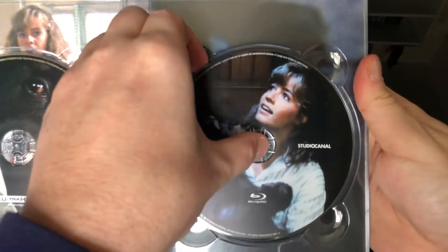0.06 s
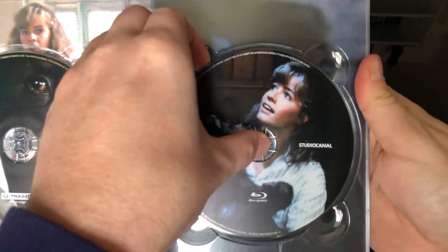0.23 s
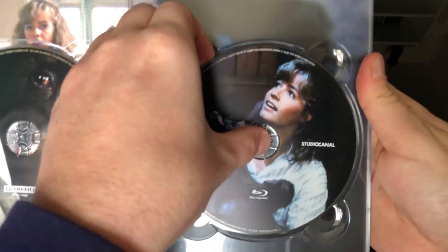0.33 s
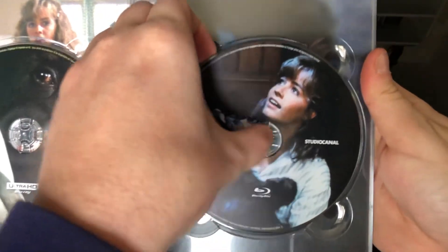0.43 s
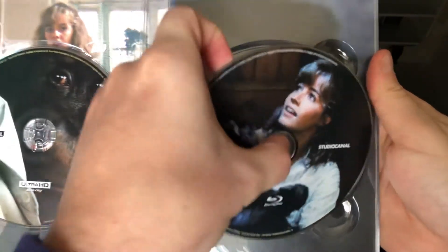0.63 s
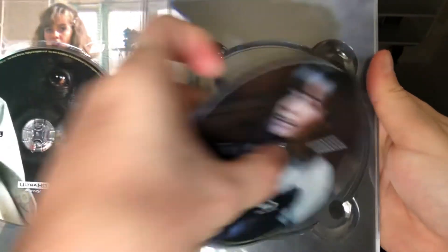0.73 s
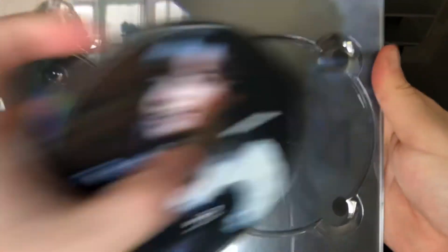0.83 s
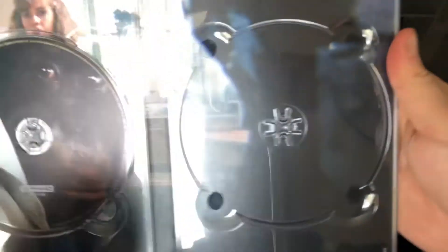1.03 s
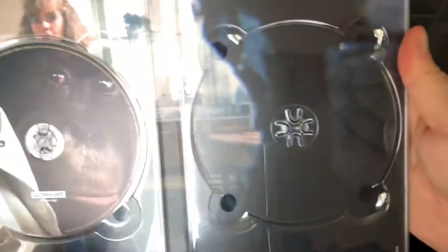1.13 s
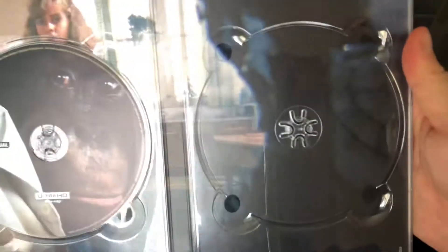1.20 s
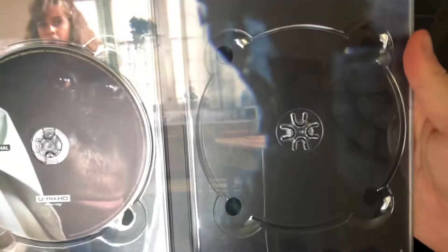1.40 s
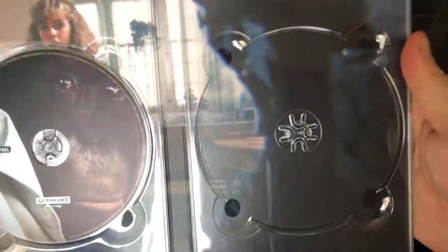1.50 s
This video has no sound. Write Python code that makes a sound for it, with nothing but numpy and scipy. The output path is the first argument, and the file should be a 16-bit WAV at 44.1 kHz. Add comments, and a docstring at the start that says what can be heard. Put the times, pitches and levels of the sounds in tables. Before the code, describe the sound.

A disc pops off a clear plastic tray hub, close up in a small room. Barely audible ticks come first, then one loud, bright snap at about 0.23 seconds with a low thump and decaying room tail. Lighter clicks and knocks follow from 0.4 to 0.65, a faint plastic rub with a ringing tone near 1.14, and soft dull knocks around 1.34 and 1.53, over faint rumble and hiss.

```python
"""A disc is prised off the hub of a clear plastic tray in a small room, close to the microphone.
The hub lets go with one sharp snap, a cluster of short slips; lighter contacts tick and knock around it.
Every contact rings the same plastic modes, its lows arriving last, and the room answers with a decaying tail.
Grains of noise swell as rubs of plastic on plastic, one with a ringing tone, over a faint rumble and hiss."""
import sys
import numpy as np
from scipy import signal
from scipy.fft import rfft, irfft, next_fast_len
from scipy.io import wavfile

SR = 44100
rng = np.random.default_rng(int(sys.argv[2]) if len(sys.argv) > 2 else 0)


def dump(signal):
    """Clip the signal to [-1, 1] and save it as 16-bit WAV at the path in sys.argv[1]."""
    limited = np.clip(np.atleast_2d(signal).T, -1, 1)
    pcm = np.round(limited * 32767).astype(np.int16)
    wavfile.write(sys.argv[1], SR, pcm)


N = 68355   # length in samples
PADDED = next_fast_len(N + SR // 2)   # room for echoes to run past the end without wrapping round
HZ = np.maximum(np.fft.rfftfreq(PADDED, 1 / SR), 1)
T = np.arange(N) / SR   # seconds


def from_db(db):
    """Decibels to gain."""
    return 10 ** (np.asarray(db) / 20)


def rms_one(x):
    """Scale to unit rms."""
    return x / np.sqrt(np.mean(x ** 2) + 1e-20)


def at_hz(points, hz):
    """Read a table of (Hz, value) along log frequency."""
    f, value = np.transpose(points)
    return np.interp(np.log(hz), np.log(f), value)


def filtered(x, response):
    """Pass a signal through a frequency response."""
    return irfft(rfft(x, PADDED) * response, PADDED)[:N]


def resonance(hz, width_hz):
    """Response of one mode, gain 1 on top."""
    return 1 / (1 + 1j * (HZ ** 2 - hz ** 2) / (HZ * width_hz))


def contacts(rows):
    """Force of short contacts: impulses, each with its own colour, the lows trailing the highs."""
    # Centres of the bands in which each contact's force is given, [Hz].
    bands_hz = [150, 400, 850, 1700, 4000, 11000]
    lag_cycles, lag_knee_hz = 1.6, 71.6   # delay in seconds = lag_cycles / (frequency + knee)
    low_cut_hz = 62   # the small plates radiate little deep bass
    force = 0
    for start_s, *band_dbs in rows:
        colour = from_db(at_hz(list(zip(bands_hz, band_dbs)), HZ))
        force = force + colour * np.exp(-2j * np.pi * HZ * start_s)
    lag = np.exp(-2j * np.pi * lag_cycles * np.log(1 + HZ / lag_knee_hz))
    low_cut = HZ ** 2 / (HZ ** 2 + low_cut_hz ** 2)
    return irfft(force * lag * low_cut, PADDED)[:N]


def tray(force):
    """The short ring of disc and tray, heard directly: strong modes and a dense shimmer of weak ones."""
    # Modes of disc and tray ringing together.
    # Each row: frequency in Hz, width in Hz, gain at its peak in dB.
    mode_rows = [(146, 32, -7), (265, 110, -15.5), (394, 110, -22), (575, 94, -10), (813, 80, -12.5),
                 (1072, 120, -11), (1235, 80, -7.5), (1710, 220, -11.5), (2323, 150, -1), (2445, 43, -4.5),
                 (2796, 240, 1.5), (3400, 310, -2), (3980, 170, -3.5), (4550, 180, -10), (4998, 250, -9),
                 (5650, 410, -15.5), (6430, 260, -6), (7420, 520, -12.5), (8480, 300, -15.5),
                 (10400, 550, -12.5), (11200, 180, -16.5), (12800, 400, -24), (15530, 800, -12)]
    shimmer_db, shimmer_t60_s = -16.5, 0.027
    shimmer_hz, shimmer_width_hz = 3660, 2700
    modes = sum(from_db(db) * resonance(hz, width_hz) for hz, width_hz, db in mode_rows)
    dying_noise = rng.standard_normal(N) * from_db(-60 * T / shimmer_t60_s)
    weak_modes = rms_one(dying_noise) / np.sqrt(N)   # unit energy
    shimmer = rfft(weak_modes, PADDED) * resonance(shimmer_hz, shimmer_width_hz)
    return filtered(force, modes + from_db(shimmer_db) * shimmer)


def room(force):
    """After a short gap, dense early reflections and a tail that dies band by band, plus one low mode."""
    # The room's colour in answer to a unit contact. Each row: frequency in Hz, level in dB.
    colour = [(80, -27.5), (160, -21), (350, -22.5), (550, -17.5), (750, -21), (1100, -12.5), (1700, -18),
              (2300, -12.5), (3400, -16.5), (5000, -10.5), (6500, -19), (9000, -22.5), (15500, -28.5)]
    # Late decay. Each row: frequency in Hz, time to fall 60 dB in s.
    late_t60 = [(150, 0.42), (1000, .48), (2700, .42), (5500, .44), (9000, .35), (15000, .29)]
    gap_s, rise_s = 0.01, 0.003
    early_t60_s, early_db = 0.094, 5.5   # early level is relative to the start of the late tail
    hum_hz, hum_width_hz, hum_db = 165.5, 3, -4.5   # narrow, so this low hum hangs on
    age = np.maximum(T - gap_s, 0)
    rise = np.minimum(age / rise_s, 1)
    early = from_db(early_db - 60 * age / early_t60_s)
    white = rfft(rng.standard_normal(N), PADDED)
    tail = 0
    edges = np.geomspace(50, 18000, 22)   # band edges in Hz
    for low, high in zip(edges, edges[1:]):
        band = irfft(white * ((HZ >= low) & (HZ < high)), PADDED)[:N]
        late = from_db(-60 * age / at_hz(late_t60, np.sqrt(low * high)))
        flat_gain = np.sqrt(2 * (high - low) / SR / N)   # equal energy per Hz before the colour
        tail = tail + rms_one(band * (late + early) * rise) * flat_gain
    hum = from_db(hum_db) * resonance(hum_hz, hum_width_hz)
    return filtered(force, rfft(tail, PADDED) * from_db(at_hz(colour, HZ)) + hum)


def treble_shelf(db):
    """Lift or lower the top, half of the change in dB at the corner."""
    corner_hz = 4940
    return from_db(db * HZ ** 4 / (HZ ** 4 + corner_hz ** 4))


def swell(peak_s, attack_s, release_s):
    """Exponential rise to a peak, then exponential fall."""
    return np.exp(-np.maximum((peak_s - T) / attack_s, (T - peak_s) / release_s))


def rubbing():
    """Plastic sliding on plastic: each stroke is a swell of dense, tiny, uneven slips."""
    # Each row: peak in s, attack in s, release in s, level at the peak in dB, treble shelf in dB.
    strokes = [(0.56, .03, 0.042, -71, 4), (0.667, .03, 0.0089, -61.5, 1), (0.961, .16, .07, -71, 5.5),
               (1.085, 0.028, 0.022, -68, 8), (1.130, 0.025, 0.02, -58.5, -1.5),
               (1.143, 0.016, .036, -59.5, -8.5)]
    # Colour of the friction ahead of each stroke's treble shelf. Each row: frequency in Hz, level in dB.
    colour = [(100, -12.5), (330, -2), (550, -2.5), (850, -1.5), (1100, -6), (1650, -1.5), (2400, -6),
              (2900, -9.5), (5000, -12.5), (7000, -15.5), (10000, -20.5), (15500, -17.5)]
    grains_per_s, grain_db = 9000, 1.5   # mean density; mean random boost before its cap
    out = 0
    for peak_s, attack_s, release_s, db, treble_db in strokes:
        slips = rng.random(N) < grains_per_s / SR
        boost = from_db(grain_db * np.minimum(rng.exponential(1, N), 4))
        grains = slips * rng.standard_normal(N) * boost
        friction = rms_one(filtered(grains, from_db(at_hz(colour, HZ)) * treble_shelf(treble_db)))
        out = out + from_db(db) * swell(peak_s, attack_s, release_s) * friction
    return out + singing()


def singing():
    """The rubbed disc rings: narrow noise gives a tone of wandering phase, swelling with the last strokes."""
    ring_hz, pass_width_hz, ring_db = 825, 10, -61   # the resonance is passed twice
    peak_s, attack_s, release_s = 1.148, 0.031, 0.053
    ring = signal.hilbert(filtered(rng.standard_normal(N), resonance(ring_hz, pass_width_hz) ** 2))
    tone = rms_one(np.cos(np.angle(ring)))   # keep the phase, even out the level
    return from_db(ring_db) * swell(peak_s, attack_s, release_s) * tone


def background():
    """Steady room rumble and faint hiss: noise with a fixed colour."""
    # Each row: frequency in Hz, relative level in dB.
    colour = [(25, -9.5), (50, 1.5), (90, 0), (145, 0.5), (250, -1), (450, -6.5), (800, -11.5), (1300, -18),
              (2500, -21), (6000, -26), (12000, -27.5), (15500, -23.5)]
    floor_db = -66   # overall rms
    noise = filtered(rng.standard_normal(PADDED), from_db(at_hz(colour, HZ)))
    return from_db(floor_db) * rms_one(noise)


def scene():
    """Contacts on the tray, each slip stirring the room in its own way, then the rubbing and the background."""
    # The hub slips, lets go and clatters, then the tray thumps back.
    # Each row: start in seconds before the lag, then force in dB at each contact band before the low cut.
    snap_rows = [(0.22665, -4.5, -0.5, 11.5, 17, 18, 2.5), (0.2281, 13.5, 20, 23.5, 24.5, 20.5, 19.5),
                 (0.2294, -0.5, 2.5, -1.5, 3.5, 13, 15), (0.2380, 26, 18, 5.5, -8, -9.5, -10.5)]
    # Light contacts of disc and fingers. Each row: the same columns, start in seconds and force in dB.
    tap_rows = [(0.0130, -27, -29.5, -22, -22, -31, -22), (0.085, -27.5, -15, -20, -29, -41.5, -42),
                (0.138, -27, -25, -29, -29.5, -36, -41), (0.2058, -29, -19, -20, -15.5, -20.5, -22),
                (0.2172, -20, -26, -12, -21.5, -21, -27), (0.3997, -28, -17, -38, -4, -19, -15.5),
                (0.4093, -2.5, 3, 2, -15, -14.5, -3.5), (0.488, -9.5, -9.5, -13, -19, -24, -40),
                (0.494, -13, -8, -21, -18.5, -34, -36.5), (0.5850, 4.5, 1.5, 11.5, -10, -32, -29),
                (0.6188, -11, -6, -2.5, -22.5, -31.5, -38), (0.648, -13, -12.5, -9, -32, -38, -40),
                (1.338, -5.5, -7, -29, -43, -47, -51), (1.5330, 8.5, 9, -2, -22.5, -40, -44),
                (1.539, 3, -6.5, -17.5, -28, -34, -43)]
    tap_room_db = -7   # light contacts stir the room less than the snap
    slips = [contacts([row]) for row in snap_rows]
    taps = contacts(tap_rows)
    direct = tray(sum(slips) + taps)
    echo = sum(room(slip) for slip in slips) + from_db(tap_room_db) * room(taps)
    return (direct + echo + rubbing() + background())[None]


def record(dry):
    """At the microphone's output, peaks are rounded and the top is cut steeply."""
    cutoff_hz = 15900
    low_pass = signal.ellip(10, 0.3, 70, cutoff_hz, fs=SR, output="sos")   # 0.3 dB ripple, 70 dB stop
    return signal.sosfilt(low_pass, np.tanh(dry))


dry = scene()
out = record(dry)
dump(out)
```